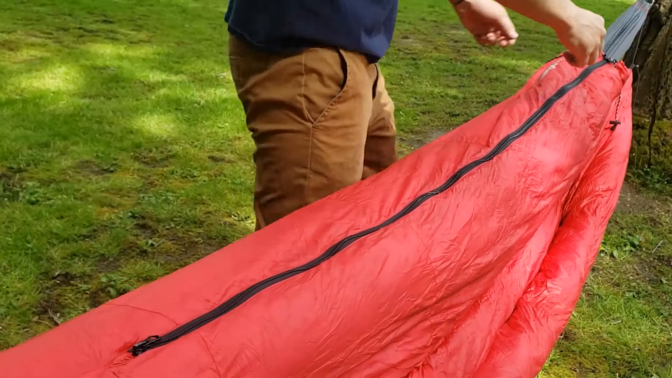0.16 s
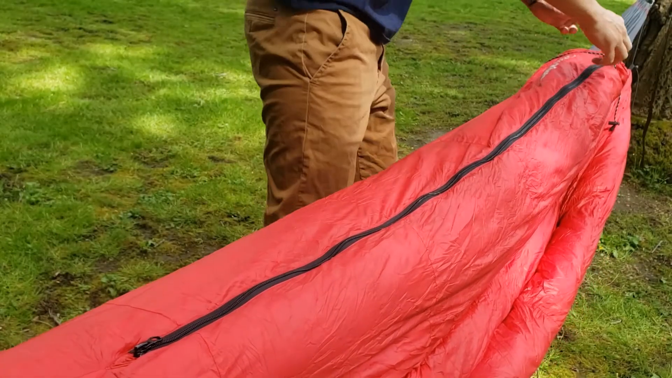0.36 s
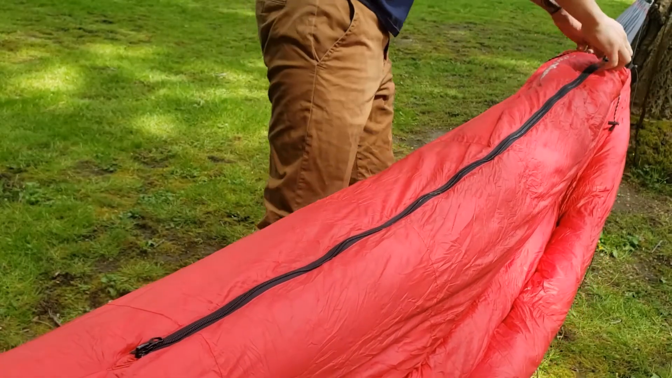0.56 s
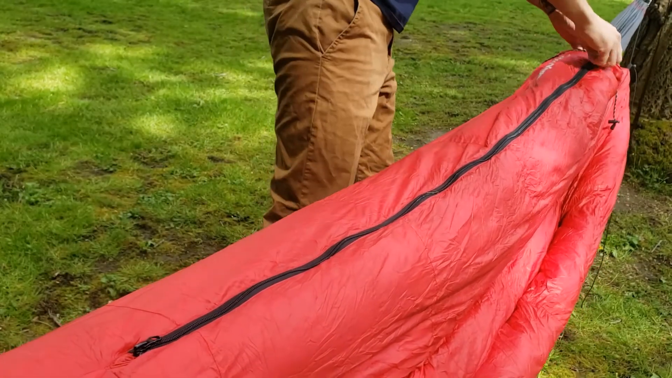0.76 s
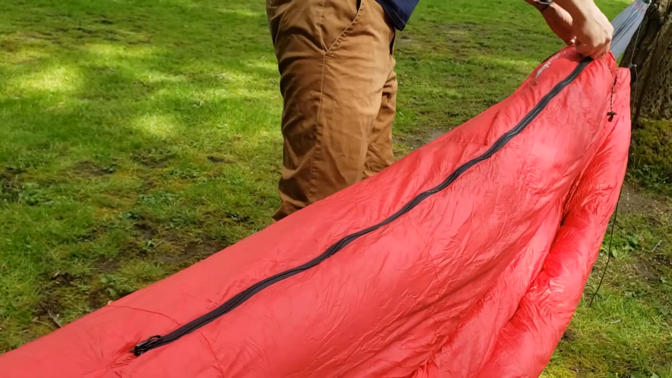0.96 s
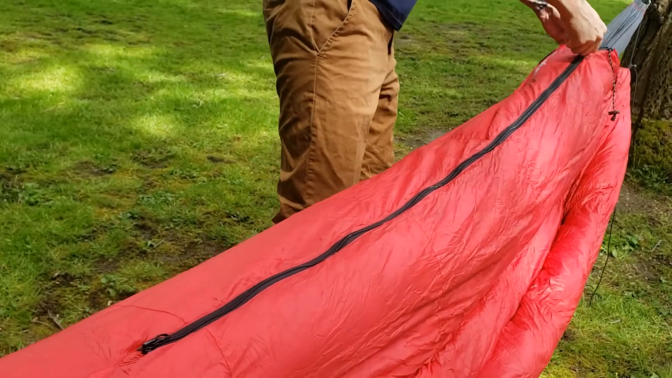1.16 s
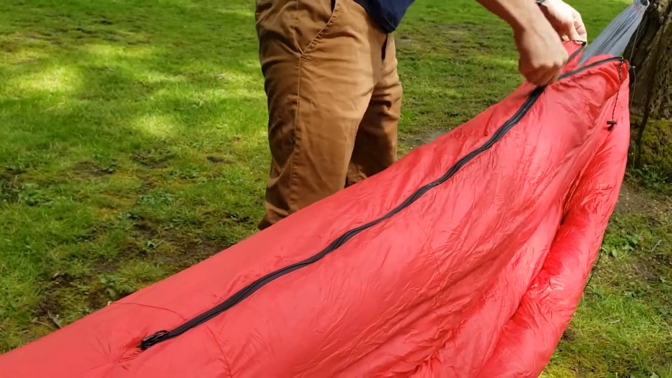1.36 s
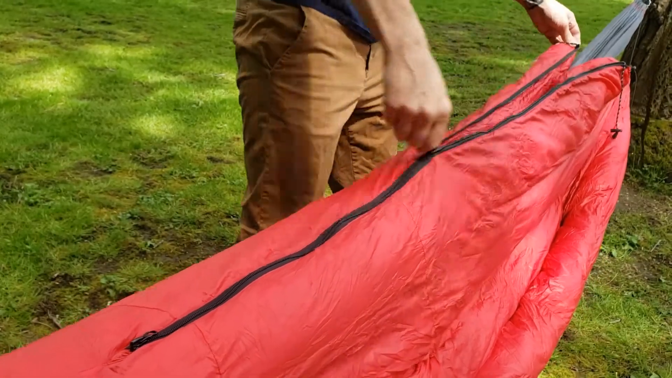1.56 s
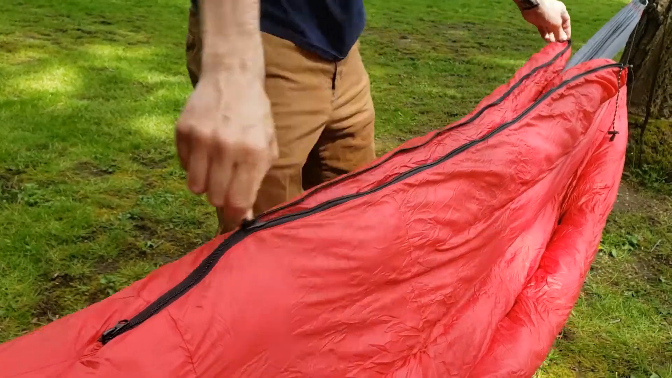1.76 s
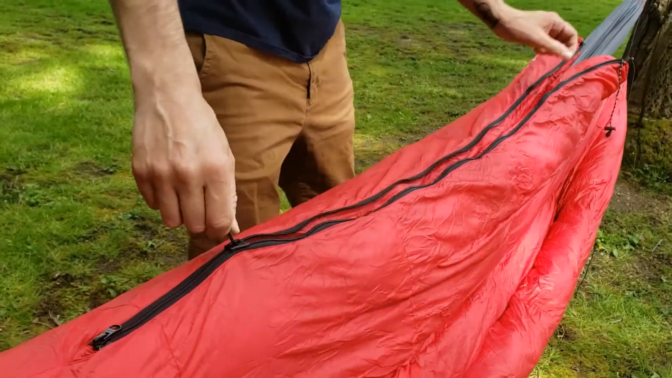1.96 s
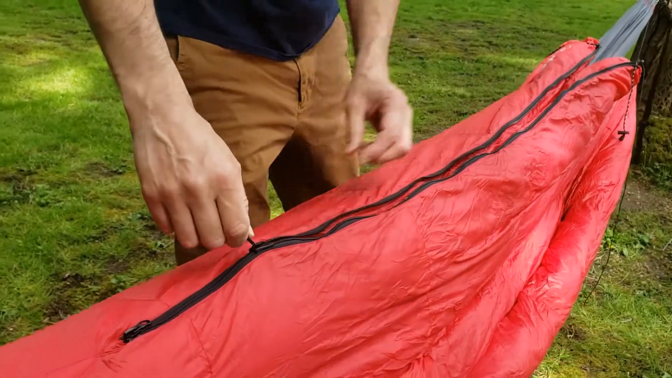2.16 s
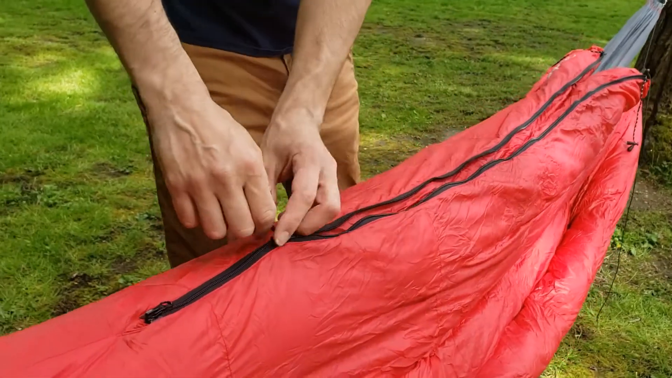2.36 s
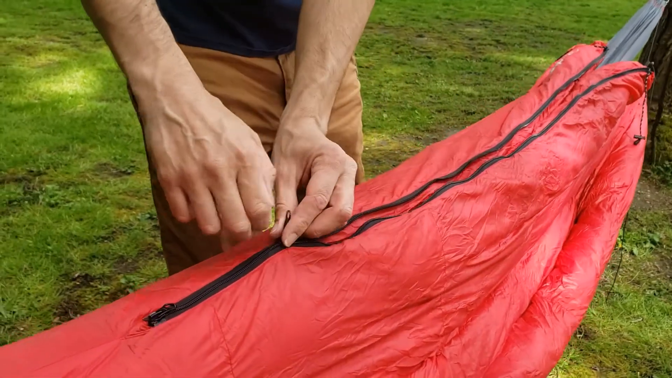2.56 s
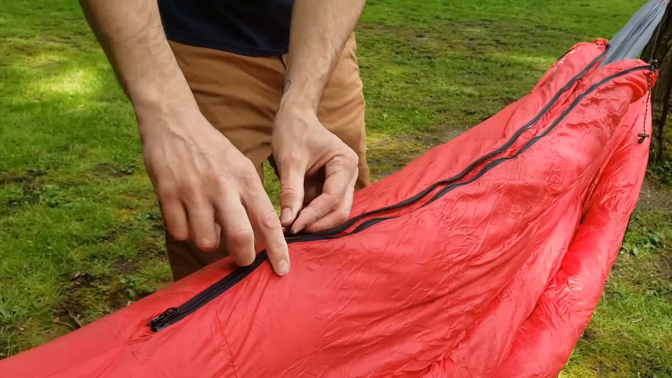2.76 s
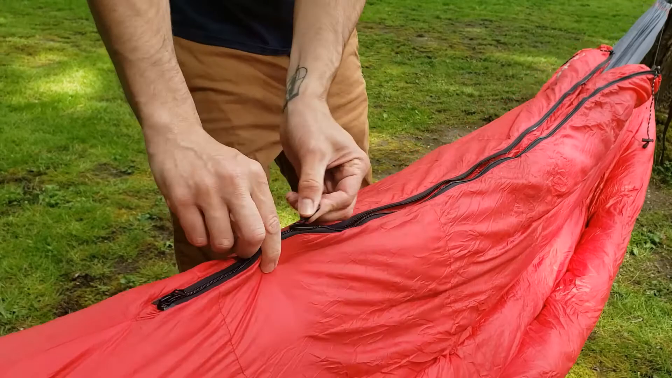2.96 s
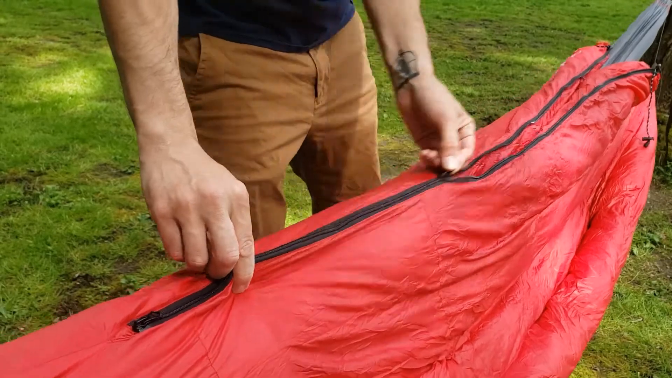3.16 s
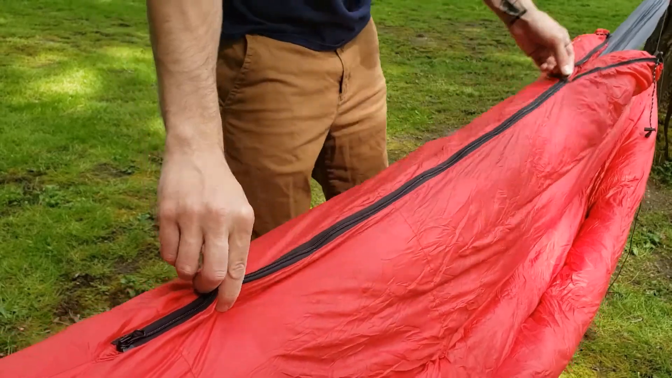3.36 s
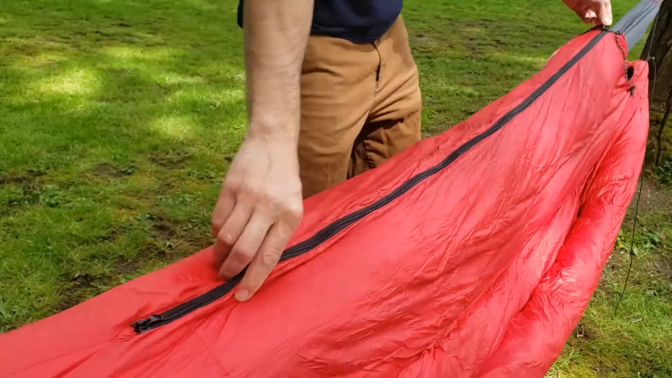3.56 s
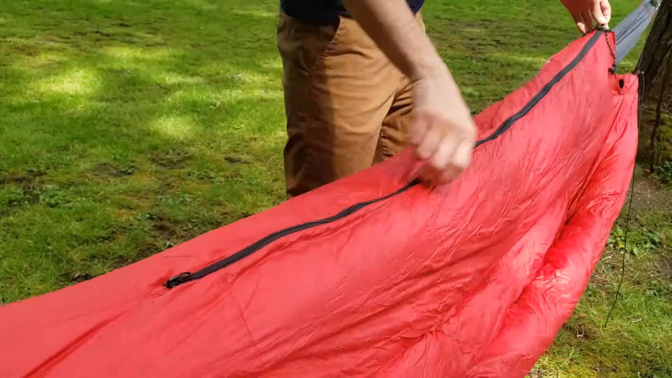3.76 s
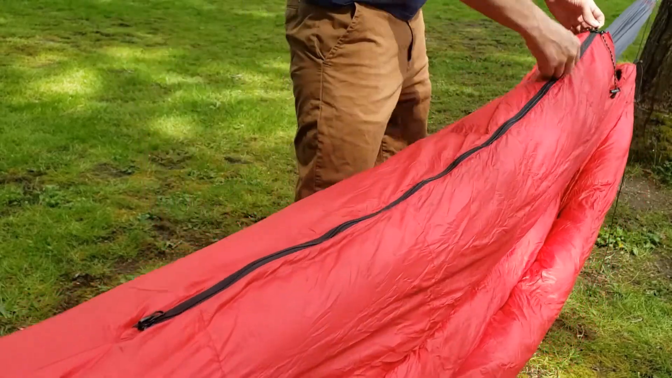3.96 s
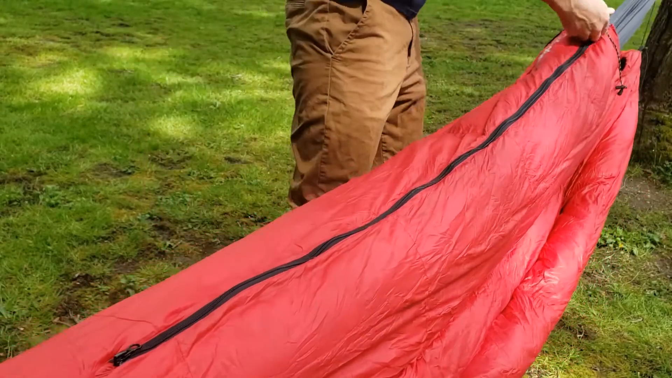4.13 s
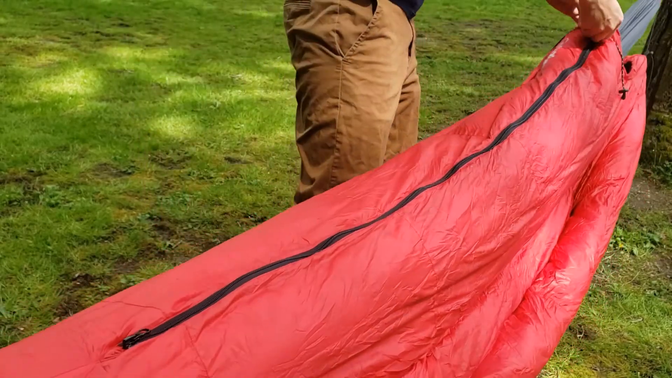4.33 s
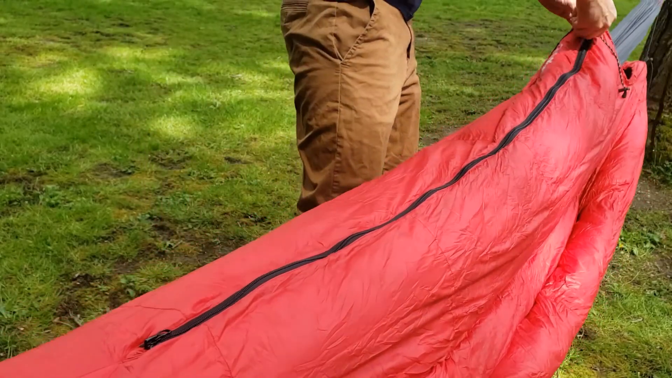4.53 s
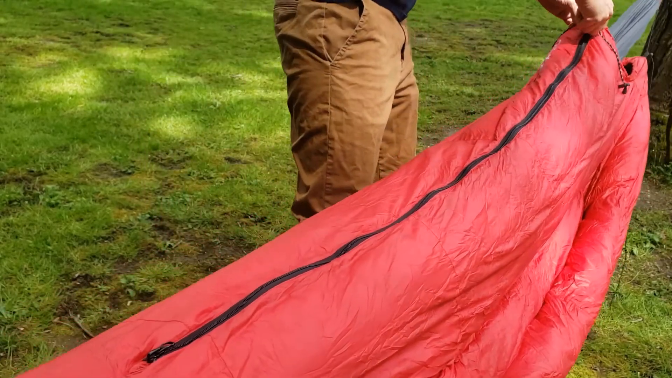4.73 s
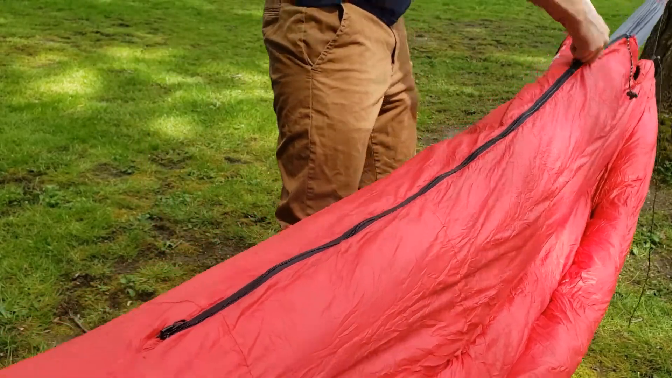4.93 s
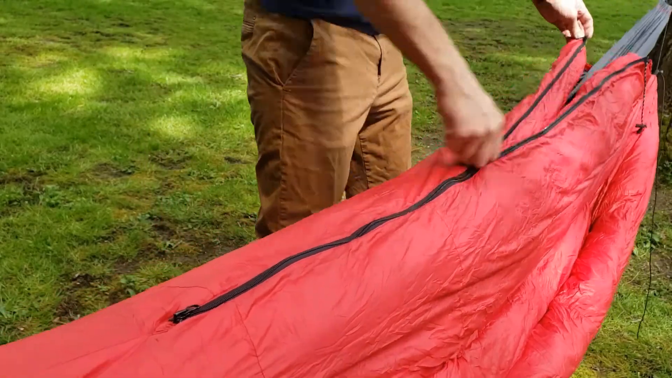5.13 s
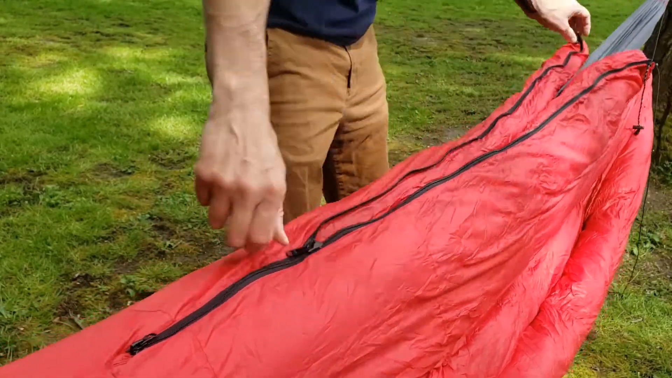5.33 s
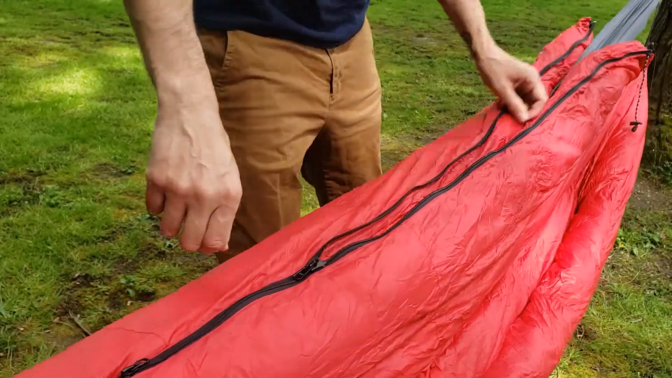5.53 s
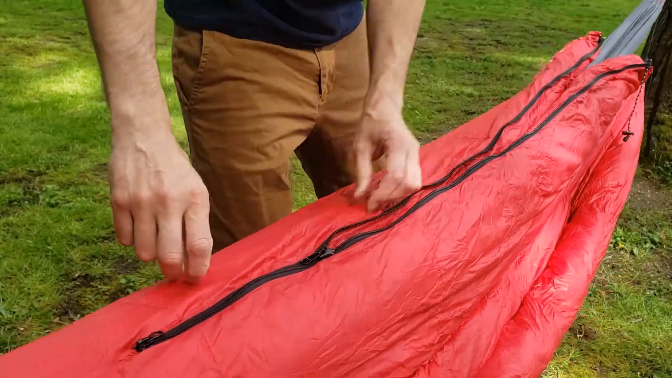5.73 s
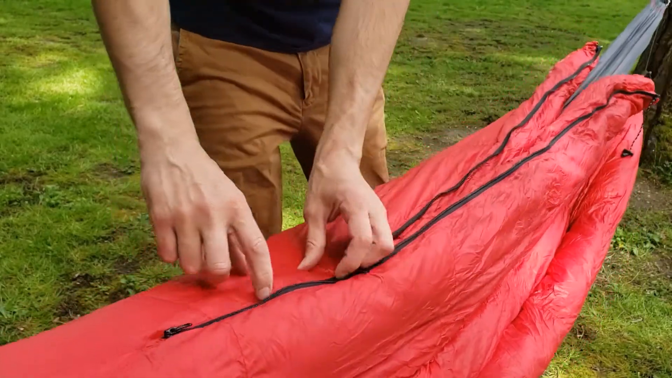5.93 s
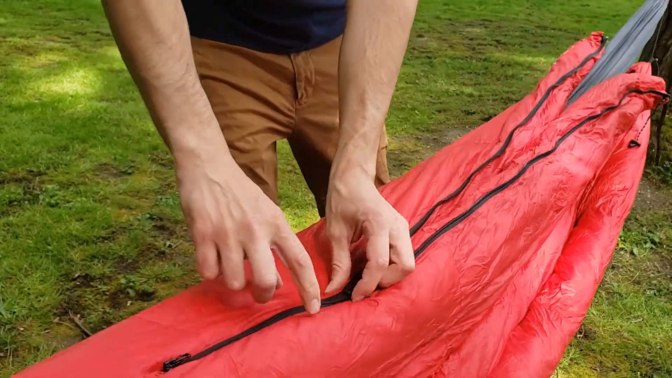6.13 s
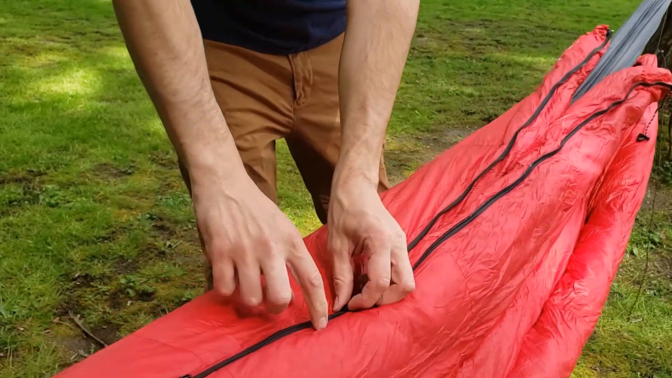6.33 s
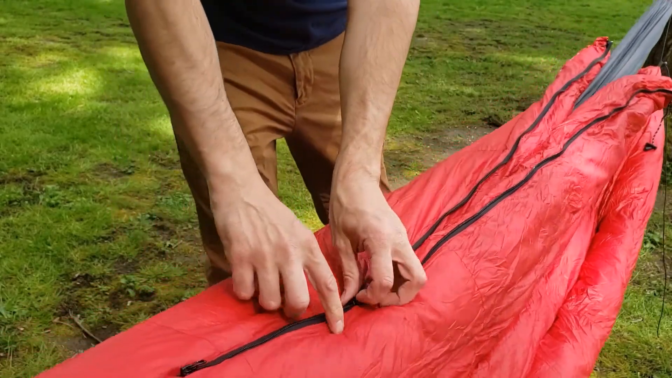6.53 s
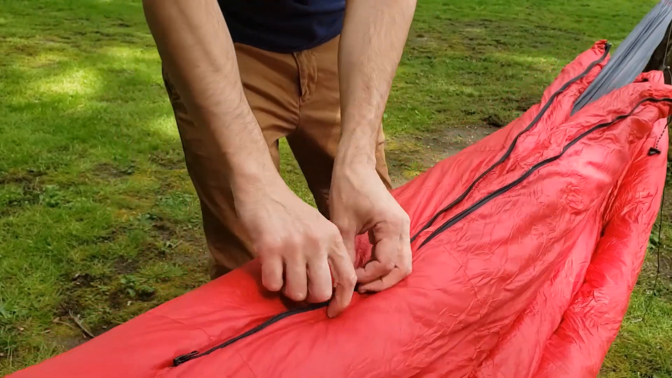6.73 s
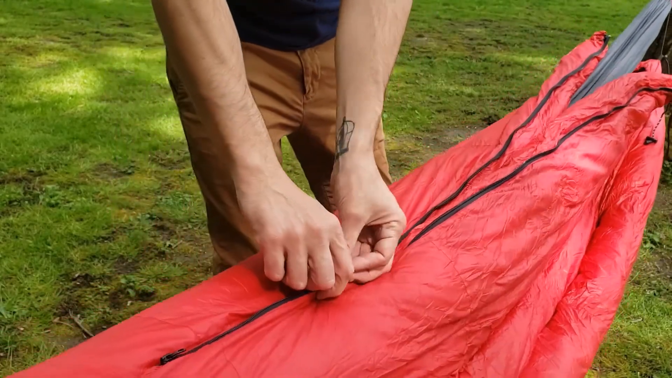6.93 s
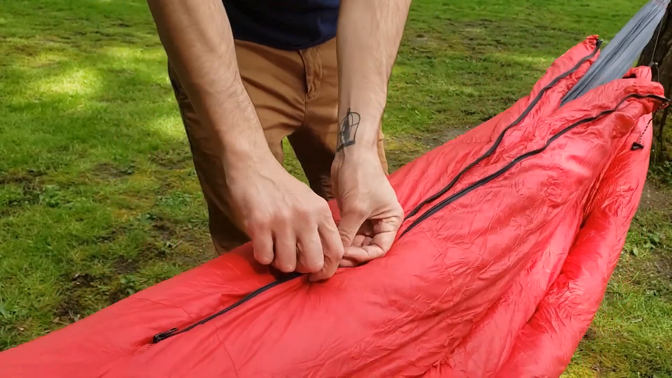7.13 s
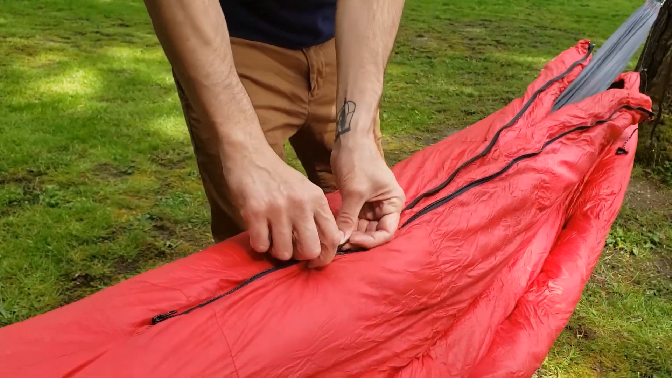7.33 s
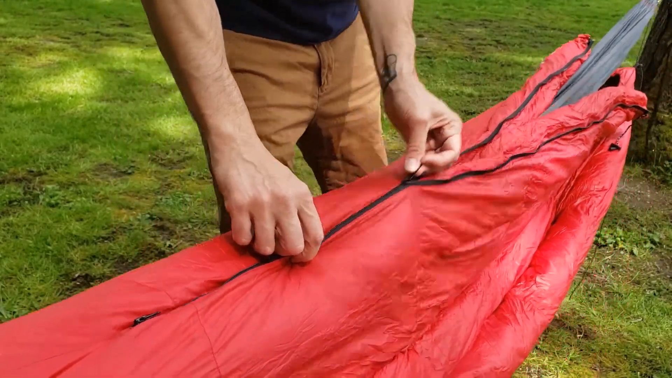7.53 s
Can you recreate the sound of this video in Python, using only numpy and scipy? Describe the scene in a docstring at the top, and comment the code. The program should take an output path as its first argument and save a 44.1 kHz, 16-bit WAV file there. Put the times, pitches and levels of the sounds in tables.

```python
"""Sleeping bag zipper among trees

The long plastic zipper of a nylon sleeping bag, slung between trees, is pulled four times.
Each tooth ticks through the slider, so the rasp rises and falls in pitch with the speed of the hand.
Shaped noise makes the rustling nylon, snaps and far traffic; sine waves make the metal tab's clinks,
a distant engine, a small bird and faint squeaks."""
import sys
import numpy as np
from scipy import signal
from scipy.fft import rfft, irfft, next_fast_len
from scipy.io import wavfile
from scipy.ndimage import uniform_filter1d, map_coordinates

SR = 44100
rng = np.random.default_rng(int(sys.argv[2]) if len(sys.argv) > 2 else 0)


def unload_audio(sound):
    """Save the sound as a 16-bit wav file, at the path given as the first command line argument."""
    columns = np.transpose(np.atleast_2d(sound))
    # keep every value between -1 and 1, then stretch to whole-number steps
    steps = np.round(np.clip(columns, -1, 1) * 32767)
    wavfile.write(sys.argv[1], SR, steps.astype(np.int16))


N = 334542  # length in samples

# what the taut tape radiates of a tooth's tick: f/Hz, relative level/dB
TICK_COLOUR = [(100, -9), (250, -1), (500, 5), (900, -6), (1500, 2.5), (2000, 2), (3000, 1.5), (3600, -2.5),
               (5000, -0.5), (7500, -0.5), (11000, -0.5), (16000, 0.5)]
# colour of the slider's scrape: f/Hz, relative level/dB per Hz
SCRAPE_COLOUR = [(150, -52), (700, -15.5), (2200, -12), (3300, -14.5), (4500, -11.5), (6000, -12),
                 (8000, -13.5), (10000, -10.5), (13000, -5), (15000, -5.5), (16000, -1.5)]
# how well the tape carries a harmonic: f/Hz, gain/dB
TAPE_RING = [(200, -1.5), (400, -0.5), (600, -3.5), (1100, -1), (1400, -0.5), (1700, -4), (2200, 2.5),
             (2900, 5), (3700, 1), (4800, 3), (6500, -13)]
# how each part grows: dB per doubling of speed, dB from far end to middle, dB per dB of force
TONE_LAW, OCTAVE_LAW = (4, 12.2, 0.089), (4.04, 10.45, 1.0)
TICK_LAW, SCRAPE_LAW = (6.3, 9.1, 0.73), (5.14, 7.4, 1.0)
REFERENCE_TEETH_PER_S = 1000  # the speed at which a law's speed part adds nothing
SCRAPE_DB = -42  # at the far end, at the reference speed, with a force of 0 dB and before panning
FOURTH_DB = -2  # the fourth harmonic against the third, before the tape's ring
TONE_SINGS, OCTAVE_SINGS = 0.86, 1.17  # dB per dB of the tape's freedom
SWAY = 24  # radians of phase sway per unit of unevenness, for the first harmonic
PAN_FAR_DB, PAN_MIDDLE_DB = -3.5, -2  # left minus right, before each pull's own shift


def zipper(tooth_db=2.0, chatter_db=0.5, bite=0.2):
    """Passing teeth shake the tape into a tone, tick one by one and scrape through the slider."""
    speed, force_db, sing_db, place, settings = slider()
    tone_db, octave_db, third_db, tick_db, side_db, unevenness = settings

    def growth(law):
        """The gain in dB from speed, place and force."""
        per_doubling, to_middle, per_force = law
        doublings = np.log2(speed / REFERENCE_TEETH_PER_S)
        return per_doubling * doublings + to_middle * place + per_force * force_db

    at = tooth_clock(speed, unevenness, flutter=.014)
    turn = 2 * np.pi * np.interp(np.arange(N), at, np.arange(len(at)))  # one turn per tooth

    # the tape tightens and slackens as it feeds in; its two rows of teeth alternate and sound the octave
    first_db = tone_db + TONE_SINGS * sing_db + growth(TONE_LAW)
    second_db = octave_db + OCTAVE_SINGS * sing_db + growth(OCTAVE_LAW)
    upper_db = third_db + growth(OCTAVE_LAW)
    tone = 0
    for order, db in enumerate([first_db, second_db, upper_db, upper_db + FOURTH_DB], 1):
        # uneven teeth smear the harmonics, the higher ones more
        sway = SWAY * unevenness * np.array([wobble(280), wobble(280)]) * np.sqrt((order + 1) / 2)
        gain = amp(db + along(TAPE_RING, order * speed)) * flicker(2.3, 170)
        tone = tone + gain * np.sin(order * turn + sway)
    tone = np.sqrt(2) * tone * amp([[-.5], [.5]])  # slightly stronger on the right

    # every tooth has its own strength; dividing by the root of the speed keeps the ticks' power
    # even before TICK_LAW makes fast pulls louder
    sizes = amp(tooth_db * rng.standard_normal(len(at))) / np.sqrt(speed[at.astype(int)])
    scattered = through_folds(pulses(at, sizes), t60=.014, rate=90, count=8)
    ticks = amp(tick_db + growth(TICK_LAW)) * coloured(scattered, TICK_COLOUR)

    # the slider scrapes in a burst on each tooth
    bursts = (1 + bite * np.cos(turn)) * flicker(chatter_db, rate=530)
    scrape = coloured(rng.standard_normal((2, N)) * bursts, SCRAPE_COLOUR)
    scrape = amp(SCRAPE_DB + growth(SCRAPE_LAW)) * scrape

    pan_db = side_db + PAN_FAR_DB + (PAN_MIDDLE_DB - PAN_FAR_DB) * place
    rasp = (ticks + scrape) * amp(np.array([pan_db, -pan_db]) / 2)
    return during(PULLS) * (right_first(tone, lag_ms=0.082) + rasp)


# one table per pull: t/s, speed/teeth per s, force of the hand/dB, how freely the tape sings/dB
PULLS = [
    [(1.078, 220, -17, 7), (1.1, 290, -7.5, 7), (1.23, 540, -2, 3), (1.33, 1080, -2, -1),
     (1.385, 1185, -3, -1.5), (1.435, 1390, -3, -4), (1.485, 1270, -0.5, -1), (1.56, 1360, -1.5, 3),
     (1.655, 1314, 1, 2.5), (1.688, 1240, 3.5, -1.5), (1.745, 810, 2, 3.5), (1.8, 377, 3, 0),
     (1.825, 157, -5, -2)],
    [(2.95, 125, -5, -7.5), (3.0, 330, 0, -0.5), (3.03, 527, -0.5, -1.5), (3.065, 590, 2, 1.5),
     (3.09, 925, 4, 0.5), (3.125, 1080, -0.5, 4), (3.18, 1440, 1, -2.5), (3.26, 1600, -1.5, 3),
     (3.33, 1536, -0.5, -6.5), (3.46, 1254, -0.5, -0.5), (3.54, 700, 4, -1), (3.6, 560, 1.5, 7.5),
     (3.63, 380, 4.5, -15), (3.69, 420, 5.5, -11), (3.725, 620, 5.5, 3.5), (3.765, 384, 4, -19.5),
     (3.79, 260, -8, -10)],
    [(4.79, 245, -22, -6), (4.83, 396, -5, 5.5), (4.87, 556, -2, 6.5), (4.98, 1200, -5, -1),
     (5.06, 1750, -2.5, -24), (5.12, 1980, -0.5, -2), (5.168, 2060, 0, -1.5), (5.21, 1740, -1.5, 4.5),
     (5.245, 1500, 3, -3.5), (5.272, 840, 1, -2.5), (5.3, 395, 2.5, 3), (5.318, 243, -5, -14)],
    [(7.365, 163, -16, 12), (7.392, 247, 0.5, 6.5), (7.42, 362, -3, -1.5), (7.47, 520, -1, 8),
     (7.505, 690, -1, -2), (7.555, 1000, -2.5, 7), (7.59, 1080, 0, -9)],
]
# for each pull: start and end place (0 = the bag's far end, 1 = its middle), then base settings:
# tooth tone level/dB, its octave level/dB, third harmonic level/dB, tick level/dB,
# left minus right/dB, unevenness of the teeth (random share of a tooth's spacing, at 1000 teeth per s)
STROKES = [(0.01, 0.73, -55.5, -60.5, -66, -47.5, 0, 0.02596),
           (1, 0, -54.5, -53.5, -65, -50.5, 0.45, 0.02085), (0.05, 0.96, -56, -61.5, -73, -48.5, 0, .027),
           (1, 0.75, -59.5, -56, -58, -47, 0.5, .014)]


def slider():
    """The hand moves the slider along the bag; inertia rounds the speed and each pull has its settings."""
    speed, force_db, sing_db = curves(np.vstack(PULLS))
    speed = uniform_filter1d(speed, size=700)
    place, settings = np.zeros(N), np.zeros((len(STROKES[0]) - 2, N))
    for k, (pull, (start, end, *row)) in enumerate(zip(PULLS, STROKES)):
        travel = np.cumsum(speed * during([pull]))
        first = np.argmax(travel > 0) if k else 0
        place[first:] = start + (end - start) * travel[first:] / travel[-1]
        settings[:, first:] = np.array(row)[:, None]
    return speed, force_db, sing_db, place, settings


def tooth_clock(speed, unevenness, flutter):
    """Sample positions of the passing teeth: their timing varies at random, most in a slow pull."""
    travel = np.cumsum(speed * np.exp(flutter * wobble(90))) / SR  # in teeth
    spread = unevenness * (REFERENCE_TEETH_PER_S / speed) ** .7
    spread = np.interp(np.arange(int(travel[-1])), travel, spread)
    marks = np.cumsum(np.abs(1 + spread * rng.standard_normal(len(spread))))
    return np.interp(marks[marks < travel[-1]], travel, np.arange(N))


def through_folds(x, t60, rate, count=4):
    """The moving bag scatters sound to each side along short paths whose strengths keep changing."""
    t = np.arange(SR // 100) / SR
    tails = rng.standard_normal((count, 2, len(t))) * amp(-60 * t / t60)
    return sum(signal.oaconvolve(x[None], pair, axes=1)[:, :N] * wobble(rate) for pair in tails)


def right_first(x, lag_ms):
    """The sound reaches the right side first, by lag_ms in all."""
    sides = np.array([[1], [-1]])
    return filtered(x, lambda hz: np.exp(-1j * np.pi * hz * lag_ms / 1000 * sides))


# a hand shifts the nylon: t/s at the loudest, rise/s, fall/s, level/dB before gain_db
RUSTLES = [(.3, .25, 0.06, -72.5), (.68, 0.74, .1, -79.5), (.89, .04, .03, -82), (1.82, 0.024, 0.1, -61.5),
           (2.02, .14, 0.092, -67), (2.335, 0.012, .09, -67.5), (2.46, 0.092, 0.17, -77),
           (2.83, 0.071, 0.046, -57), (2.95, 0.3, .05, -69.5), (3.8, 0.029, 0.23, -66),
           (3.9, 0.16, 0.27, -68), (4.04, .06, .08, -78), (4.12, 0.09, 0.17, -70.5),
           (4.37, .02, 0.051, -69.5), (4.43, .015, .015, -75), (4.557, .015, .015, -80),
           (5.345, 0.039, 0.098, -59), (5.53, 0.13, 0.15, -59), (5.79, .04, .2, -65.5),
           (5.875, 0.12, 0.34, -60.5), (6.16, 0.97, .25, -66.5), (6.48, 0.18, .1, -63),
           (6.575, 0.057, 0.096, -60.5), (6.7, 0.22, 0.24, -59.5), (7.05, 0.36, 0.18, -70),
           (7.22, .03, 0.083, -76.5), (7.37, 0.14, .03, -74.5)]
# colour of the nylon's rustle: f/Hz, relative level/dB per Hz
NYLON_COLOUR = [(880, 6.5), (1500, 4), (2550, -5.5), (2790, -6.5), (3980, -8.5), (4990, -4.5), (9010, -4),
                (15000, 3), (15800, -11)]
HELD_DB = -96  # the bag stirring while it is held, before gain_db


def nylon(crinkle_db=1.0, fold_db=0.8, gain_db=7):
    """Cloth slides under the fingers in a mass of tiny crinkles."""
    crinkles = amp(crinkle_db * wobble(900) + fold_db * wobble(45))
    rustle = coloured(rng.standard_normal((2, N)) * crinkles, NYLON_COLOUR)
    strength = amp(gain_db) * np.hypot(swells(RUSTLES), amp(HELD_DB))
    return strength * rustle * amp([[-.5], [.5]])


# fingers press and rub the tape: t/s at the loudest, rise/s, fall/s, level/dB
RUBS = [(6.51, .08, 0.044, -60.5), (6.7, 0.31, 0.17, -57)]
# colour of skin on the tape: f/Hz, relative level/dB per Hz
SKIN_COLOUR = [(300, -20), (1500, -10), (2700, -2.5), (4500, -12), (9000, -10.5), (16000, -41)]


def fingers(stick_db=-1.0):
    """Skin drags over the tape with a duller, slightly sticking rub."""
    drag = rng.standard_normal((2, N)) * flicker(stick_db, rate=250)
    return swells(RUBS) * coloured(drag, SKIN_COLOUR)


# creases snap and teeth catch: t/s, level/dB before snap_db and the filter
SNAPS = [(1.8033, -31), (2.3311, -48), (2.3594, -67), (2.9695, -37), (3.7644, -57), (5.3305, -37),
         (5.3388, -30), (5.8656, -33.5), (5.8774, -34)]
# fingers knock on the taut cloth: t/s, level/dB before tap_db and the filter
TAPS = [(2.762, -29.5), (2.768, -26), (5.339, -35)]
# the cloth under a knock: f/Hz, gain/dB
CLOTH = [(100, -14), (300, -4.5), (700, -0.5), (1300, -8), (2500, -24), (6000, -38), (16000, -38)]


def knocks(snap_db=-7, tap_db=2):
    """Creases and teeth snap brightly; fingers land dully on the cloth."""
    bright = filtered(cracks(SNAPS, t60=0.01), lambda hz: hz / np.hypot(hz, 1500))
    dull = filtered(cracks(TAPS, t60=0.016), lambda hz: amp(along(CLOTH, hz)))
    return amp(snap_db) * bright + amp(tap_db) * dull


def cracks(rows, t60):
    """A burst of dying noise for each row, falling 60 dB in t60 seconds."""
    out, t = np.zeros((2, N)), np.arange(SR // 20) / SR
    for s, db in rows:
        add(out, s, amp(db - 60 * t / t60) * rng.standard_normal((2, len(t))))
    return out


# the tab hits the slider: t/s, level/dB before ring_db
CLINKS = [(1.102, -56), (4.368, -55), (5.331, -40.5), (5.648, -81.5), (5.868, -53)]
# tones of the metal tab: f/Hz, relative level/dB, time to fall 60 dB/s
TAB_TONES = [(6200, -4.5, 0.042), (11600, -17, .03), (14800, 13, 0.061), (14700, -31, .2)]


def tab(attack=0.00029, ring_db=-1):
    """The small metal pull rings very high when it hits the slider; attack is in seconds."""
    out, t = np.zeros((2, N)), np.arange(SR // 4) / SR
    for s, db in CLINKS:
        ring = 0
        for hz, level, t60 in TAB_TONES:
            start = rng.random((2, 1)) / 4  # in turns, different on each side
            ring = ring + amp(level - 60 * t / t60) * np.sin(2 * np.pi * (hz * t + start))
        add(out, s, amp(db + ring_db) * ring * (1 - np.exp(-t / attack)))
    return out


# faint squeaks while the bag is held: t/s, f/Hz, level/dB
SQUEAKS = [(3.94, 1930, -65.5), (3.957, 1560, -66), (3.997, 1760, -67)]


def squeaks(length=0.0096):
    """Tiny wavering peeps: sine waves that swell and fade within some hundredths of a second."""
    t = np.arange(N) / SR
    waver = 0.94 * wobble(200)
    out = 0
    for s, hz, db in SQUEAKS:
        out = out + amp(db) * np.exp(-((t - s) / length) ** 2) * np.sin(2 * np.pi * hz * t + waver)
    return out


# a small bird twitters far off: t/s, f/Hz before the warble, level/dB
BIRD = [(3.865, 6240, -80), (3.879, 6700, -63), (3.889, 6050, -64), (3.9, 6650, -60), (3.909, 6300, -70),
        (3.923, 6000, -62), (3.94, 6300, -78)]


def bird():
    """One thin, warbled note: a sine wave whose pitch glides and trembles."""
    hz, db = curves(BIRD)
    turns = 2 * np.pi * np.cumsum(hz * (1 + 0.0138 * wobble(900))) / SR
    return during([BIRD]) * amp(db) * np.sin(turns)


# the far engine: t/s, firing f/Hz before the waver, level/dB before the two tones' own levels
ENGINE = [(0.0, 150, -55.5), (0.54, 144, -54), (0.96, 144.4, -51), (1.26, 145.1, -52), (1.49, 128, -53),
          (2.7, 124, -63), (3.2, 125.4, -55), (3.7, 124.9, -56), (3.8, 130.6, -64.5)]


def engine(firing_db=-0.5, half_db=-4, waver=.008):
    """A distant engine: its firing tone and the octave below, both wavering."""
    hz, level_db = curves(ENGINE)
    turns = 2 * np.pi * np.cumsum(hz * (1 + waver * wobble(13))) / SR
    firing = amp(firing_db + 2.7 * wobble(7.3)) * np.sin(turns)
    octave_below = amp(half_db + 1.4 * wobble(12.0)) * np.sin(turns / 2)
    return amp(level_db) * (firing + octave_below)


# colour of the open air: f/Hz, relative level/dB per Hz
OUTDOOR_COLOUR = [(25, -42), (38, -5.5), (55, 3.5), (110, -1.5), (150, -7.5), (260, -20.5), (480, -23.5),
                  (900, -14.5), (1200, -19), (1550, -32), (2500, -39), (8000, -56), (12000, -48.5),
                  (15800, -45)]
# how alike left and right are: f/Hz, likeness (1 = the same, 0 = unrelated)
FAR_ALIKE = [(60, 1), (125, 0.85), (250, 0.78), (500, 0.43), (1000, 0.084), (3000, 0.051), (10000, .1)]


def outdoors(level_db=-52, swell_db=3.25):
    """Far traffic and air: noise alike on both sides in the bass, nearly unrelated in the treble."""
    def shares(hz):
        """How much of each frequency goes to the middle and to the sides."""
        turn = np.arccos(np.clip(along(FAR_ALIKE, hz), -1, 1)) / 2
        return np.array([np.cos(turn), np.sin(turn)])

    mid, side = filtered(rng.standard_normal((2, N)), shares)
    air = coloured(np.array([mid + side, mid - side]), OUTDOOR_COLOUR)
    rumble = filtered(air, lambda hz: 1 / (1 + (hz / 200) ** 4))
    # only the rumble swells and sinks
    return amp(level_db) * (air + rumble * (amp(swell_db * wobble(5)) - 1))


def amp(db):
    """Decibels to a plain gain."""
    return 10 ** (np.asarray(db) / 20)


def unit(x):
    """x scaled to rms 1."""
    return x / np.sqrt(np.mean(x ** 2) + 1e-20)


def along(points, hz):
    """Read a curve of (f/Hz, value) points on a log axis."""
    f, v = np.transpose(points)
    return np.interp(np.log(hz + 1), np.log(np.abs(f) + 1), v)


def curves(rows):
    """One value per sample for each column after the time."""
    s, *cols = np.transpose(rows)
    return [np.interp(np.arange(N) / SR, s, c) for c in cols]


def during(tables):
    """1 while one of the tables runs, 0 between them, with soft edges."""
    t = np.arange(N) / SR
    on = sum((t >= rows[0][0]) & (t <= rows[-1][0]) for rows in tables)
    return uniform_filter1d(np.minimum(on, 1.), size=400)


RANGE_DB = 22  # covered in each swell's rise time and again in its fall time


def swells(rows):
    """A gain that rises to each row's level and falls away again."""
    t = np.arange(N) / SR
    power = 0
    for s, rise, fall, db in rows:
        slope = np.maximum((s - t) / rise, (t - s) / fall).clip(0, 6)
        power = power + amp(db - RANGE_DB * slope) ** 2
    return np.sqrt(power)


def wobble(rate):
    """A smooth random curve around 0, with rate random points a second."""
    knots = rng.standard_normal(int(N * rate / SR) + 4)
    fine = np.arange(0, len(knots) - 1, 1 / 8)
    return np.interp(np.arange(N) * rate / SR, fine, map_coordinates(knots, [fine]))


def flicker(depth_db, rate):
    """A random gain of rms 1 for each side, partly shared between the two."""
    shared = wobble(rate)
    own = np.array([wobble(rate), wobble(rate)])
    return unit(amp(depth_db * (shared + 0.68 * own)))


def filtered(x, response):
    """x with each frequency multiplied by a (possibly complex) response."""
    m = next_fast_len(N + SR // 4)
    return irfft(rfft(x, m) * response(np.fft.rfftfreq(m, 1 / SR)), m)[..., :N]


def coloured(x, spectrum):
    """x shaped by the given spectrum, at rms 1."""
    return unit(filtered(x, lambda hz: amp(along(spectrum, hz))))


def pulses(at, sizes):
    """Clicks at positions that may fall between samples, each drawn as a short windowed sinc."""
    index = np.floor(at)[:, None] + np.arange(-7, 9)
    lag = index - at[:, None]
    shape = np.sinc(lag) * np.cos(np.pi * lag / 16) ** 2
    index = np.clip(index, 0, N - 1).astype(int)
    return np.bincount(index.ravel(), (shape * sizes[:, None]).ravel(), N)


def add(track, s, sound):
    """Mix a short sound into the track at time s."""
    part = track[..., max(round(s * SR), 0):][..., :sound.shape[-1]]
    part += sound[..., :part.shape[-1]]


def scene():
    """The zipper and the hands at work, against the open air."""
    hands = nylon() + fingers() + knocks() + tab() + squeaks()
    background = bird() + engine() + outdoors()
    return zipper() + hands + background


TOP_HZ = 15900  # band limit


def record(dry):
    """Nothing above the band limit is kept."""
    return filtered(dry, lambda hz: hz < TOP_HZ)


dry = scene()
out = record(dry)
unload_audio(out)
```